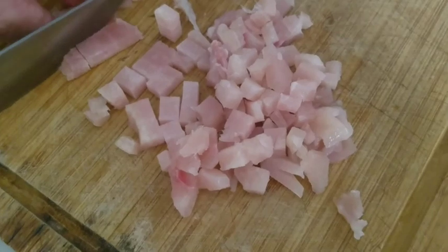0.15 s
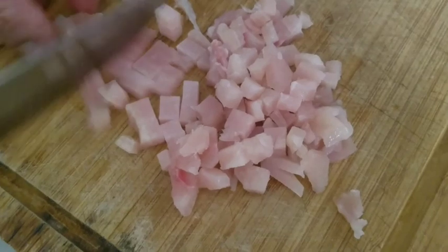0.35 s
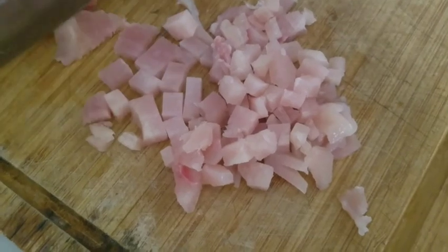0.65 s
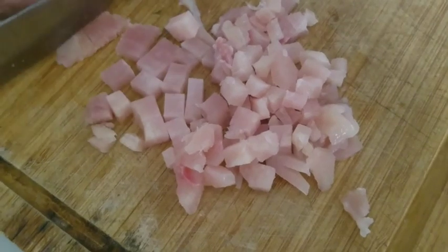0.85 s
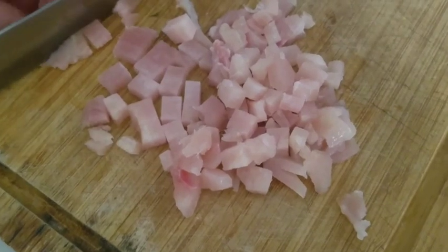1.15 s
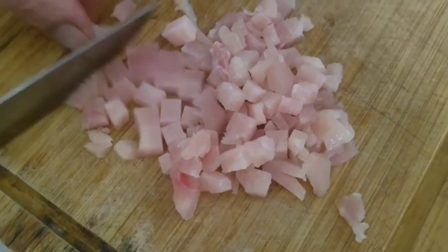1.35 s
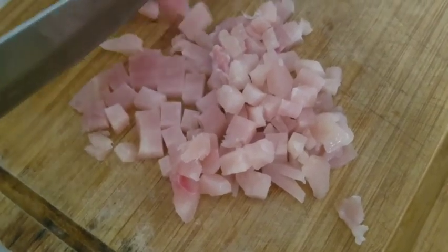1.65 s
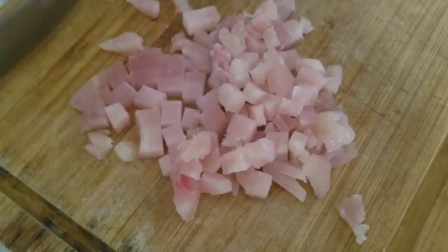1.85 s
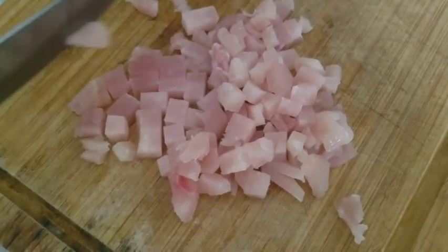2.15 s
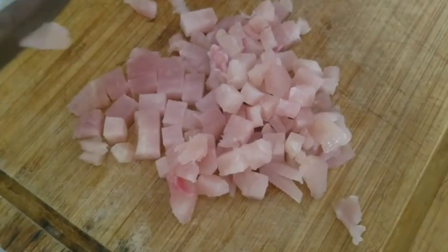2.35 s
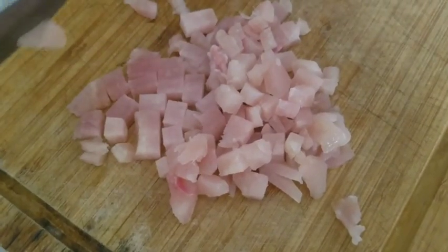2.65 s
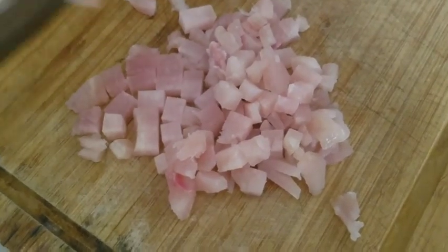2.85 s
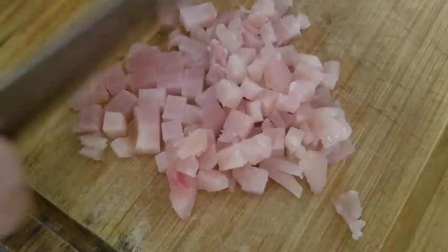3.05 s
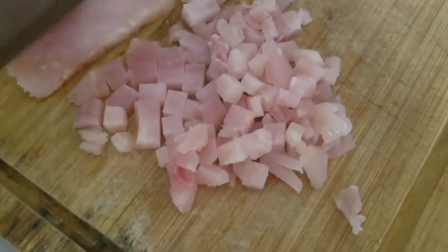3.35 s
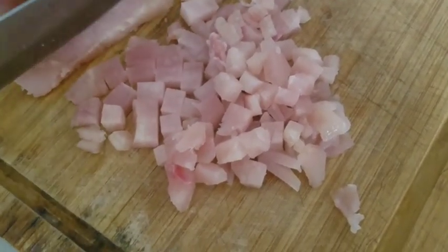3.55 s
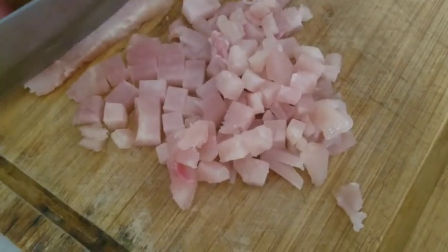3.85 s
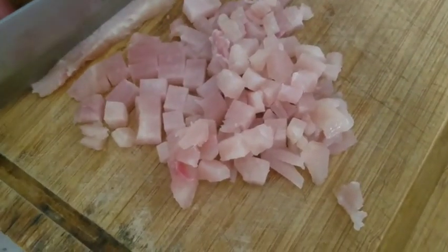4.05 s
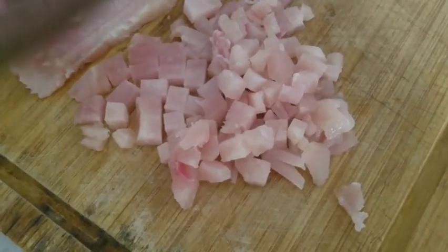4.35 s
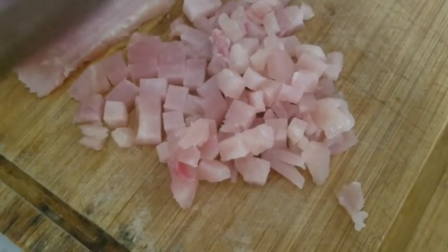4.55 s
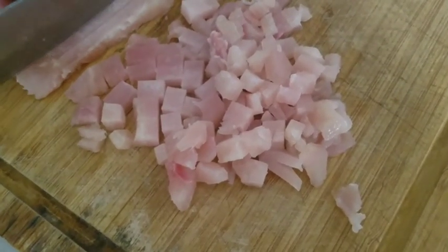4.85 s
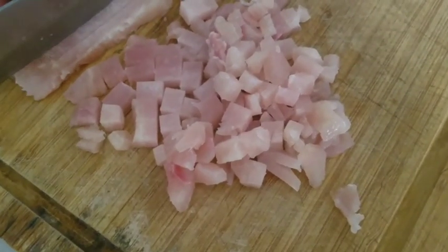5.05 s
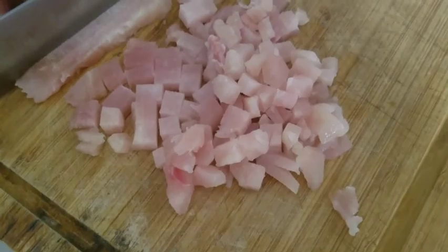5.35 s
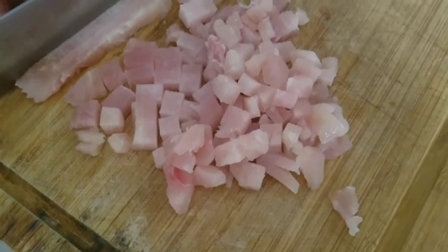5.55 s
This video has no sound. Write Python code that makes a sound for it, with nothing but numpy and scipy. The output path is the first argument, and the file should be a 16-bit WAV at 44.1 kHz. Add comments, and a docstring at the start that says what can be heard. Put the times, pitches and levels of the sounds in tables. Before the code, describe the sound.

A kitchen knife saws quietly through raw meat and lands on a wooden cutting board in separate, irregular knocks, each with a small thump from the counter. Gentle taps, wet ticks and a short scrape come first, followed by two firm chops and two harder ones. The sound is close, with a short room echo, over a faint appliance hum, microphone hiss and barely audible bird whistles.

```python
"""Cutting chicken on a board

In a small kitchen, close to the microphone, a knife cuts raw chicken into cubes on a wooden board.
The blade saws through the meat, knocks on the board, scrapes pieces aside and comes free with wet ticks.
Behind it an appliance hums, the microphone hisses, and a bird whistles faintly outside."""
import sys
import numpy as np
from scipy import signal
from scipy.fft import rfft, irfft
from scipy.io import wavfile
from scipy.ndimage import uniform_filter1d

SR = 44100
rng = np.random.default_rng(int(sys.argv[2]) if len(sys.argv) > 2 else 0)


def to_wav(s):
    """Save 16-bit WAV."""
    ch = np.atleast_2d(s).T  # columns
    pcm = np.round(np.clip(ch, -1, 1) * 32767)  # PCM
    wavfile.write(sys.argv[1], SR, pcm.astype(np.int16))


N = 250840


def amp(db):
    """Turns decibels into a number to multiply by."""
    return 10 ** (np.asarray(db) / 20)


def unit_rms(x):
    """Scales a sound so that its average strength (rms) is 1."""
    return x / np.sqrt(np.mean(x ** 2) + 1e-20)


def curve_at(points, hz):
    """Reads a smooth path through (frequency, value) points, on a log-frequency axis."""
    f, value = np.transpose(points)
    return np.interp(np.log(hz + 1), np.log(f + 1), value)


def add(mix, start, sound):
    """Mixes a sound in at a start time in seconds."""
    part = mix[..., max(round(start * SR), 0):][..., :sound.shape[-1]]
    part += sound[..., :part.shape[-1]]


def coloured(x, gain):
    """Turns each frequency up or down by gain(frequency), then scales to rms 1."""
    count = x.shape[-1]
    return unit_rms(irfft(rfft(x) * gain(np.fft.rfftfreq(count, 1 / SR)), count))


def resonance(f, hz, width):
    """A hill-shaped gain that favours frequencies near hz."""
    return 1 / (1 + ((f - hz) / width * 1.3) ** 2)


def noise_burst(hz, octaves, t60):
    """A tick of noise around hz with peak 1; t60 is the time in seconds to fade by 60 dB."""
    t = np.arange(SR // 8) / SR
    edges = np.minimum(hz * 2 ** (np.array([-.5, .5]) * octaves), SR / 2 - 100)
    noise = rng.standard_normal(len(t)) * amp(-60 * t / t60)
    out = signal.sosfilt(signal.butter(2, edges, "bandpass", fs=SR, output="sos"), noise)
    return out / abs(out).max()


# first echoes from counter, wall and cupboards: left delay/s, right delay/s, relative gain
ECHOES = [(.0052, .0047, 0.26), (.0074, 0.0061, 0.85), (.0097, 0.011, 0.54), (.0165, 0.011, 0.12),
          (.0240, .0243, .17), (.0332, 0.026, .12)]
# how long the room rings: f/Hz, t60/s
ROOM_DECAY = [(150, 0.15), (400, 0.4), (900, 0.21), (2000, 0.27), (6000, 0.38), (14000, 0.27)]
def kitchen(x, tail_db, echo_db, left_db, likeness=0.85):
    """Adds echoes and a short tail of blurred ones, most alike in both ears at low pitch."""
    count = SR // 2
    bounces = rng.choice([-1., 1.], (3, count)) * (rng.random((3, count)) < 3000 / SR)
    hz, t, bands = signal.stft(bounces, SR, nperseg=256)  # left, right, shared
    shared = np.clip(likeness / (1 + (hz / 2200) ** 2), 0, 1)[:, None]
    bands = np.sqrt(shared) * bands[2] + np.sqrt(1 - shared) * bands[:2]
    bands *= amp(-60 * t / curve_at(ROOM_DECAY, hz)[:, None])
    fade_in = np.clip((np.arange(count) / SR - .003) / 0.011, 0, 1)
    tail = signal.istft(bands, SR, nperseg=256)[1][:, :count] * fade_in
    response = amp(tail_db) * unit_rms(tail) / np.sqrt(count)
    response[:, 0] += 1  # the direct sound
    for left_s, right_s, gain in ECHOES:
        response[[0, 1], [round(left_s * SR), round(right_s * SR)]] += gain * amp(echo_db)
    balance = amp([[left_db / 2], [-left_db / 2]])
    return signal.fftconvolve(np.atleast_2d(x), response, axes=1)[:, :x.shape[-1]] * balance


# whining bands in the hiss: f/Hz, width/Hz, left level/dB, right level/dB
HISS_BANDS = [(4823, 1060, -73, -60), (5920, 320, -99, -64), (7046, 1050, -69, -54.5),
              (7062, 103, -77, -55), (8300, 760, -73.5, -74), (10850, 890, -71, -57.5),
              (13960, 3400, -67.5, -58.5), (14900, 500, -82, -70)]
def microphone_hiss(floor_db=-59):
    """An even hiss plus high whining bands, stronger on the right."""
    out = amp(floor_db) * rng.standard_normal((2, N))
    for hz, width, left_db, right_db in HISS_BANDS:
        whine = coloured(rng.standard_normal((2, N)), lambda f: resonance(f, hz, width) ** 2)
        out += amp([[left_db], [right_db]]) * whine
    return out


# tone colour of the rumble: f/Hz, relative level/dB
RUMBLE_COLOUR = [(15, -34), (25, -66), (38, -6.5), (70, -1.5), (92, -2), (192, -4), (213, -8), (242, -5.5),
                 (361, -4.5), (393, -4), (637, -15.5), (707, -13), (1120, -19), (1940, -17), (3800, -31),
                 (4940, -34), (8360, -120)]
# how alike the rumble is in both ears: f/Hz, likeness (0 to 1)
RUMBLE_LIKENESS = [(60, 0.93), (200, 0.87), (400, 0.47), (900, 0.064), (2500, 0.059)]
# motor tones: f/Hz, width/Hz, level/dB
MOTOR_TONES = [(97.2, 19, -55), (195.7, 4.1, -67), (245.5, 21, -69.5), (386.5, 20, -63), (434.4, 10.7, -61)]
def appliance(rumble_db=-50, right_db=0.5):
    """A low, airy rumble with a few wavering motor tones."""
    left, other, motor = rng.standard_normal((3, N))
    likeness = curve_at(RUMBLE_LIKENESS, np.fft.rfftfreq(N, 1 / SR))
    right = irfft(likeness * rfft(left) + np.sqrt(1 - likeness ** 2) * rfft(other), N)
    rumble = amp(rumble_db) * coloured(np.array([left, right]), lambda f: amp(curve_at(RUMBLE_COLOUR, f)))
    hum = sum(amp(db) * coloured(motor, lambda f: resonance(f, hz, width))
              for hz, width, db in MOTOR_TONES)
    return (rumble + hum) * amp([[-right_db / 2], [right_db / 2]])


# bird whistles: t/s, length/s, start f/Hz, end f/Hz
WHISTLES = [(0.098, .1, 4380, 4410), (0.669, 0.24, 4570, 4360), (1.355, .21, 4230, 4510),
            (3.3, 0.14, 4180, 4240), (3.473, .13, 4300, 4500), (4.24, 0.13, 4400, 4520)]
def bird(level_db=-63, waver=0.0036):
    """A distant bird's thin whistles; each slides in pitch, quickly at first, and wavers a little."""
    out = np.zeros(N)
    for start, length, start_hz, end_hz in WHISTLES:
        progress = np.linspace(0, 1, int(length * SR))
        drift = unit_rms(uniform_filter1d(rng.standard_normal(SR // 2), 150))[:len(progress)]
        hz = (start_hz + (end_hz - start_hz) * progress ** 0.72) * (1 + waver * drift)
        tone = np.sin(2 * np.pi * np.cumsum(hz) / SR)
        add(out, start, amp(level_db) * tone * signal.windows.tukey(len(tone), .5))
    return out


# light taps of the blade, and a few crackles within a stroke: t/s, peak level/dB, centre f/Hz
TAPS = [(.063, -41, 2200), (.248, -41, 2500), (.4416, -37.5, 1230), (.922, -42, 2800), (0.9463, -40, 3000),
        (2.1677, -28, 4240), (2.191, -36.5, 1490), (2.2247, -36.5, 1640), (3.194, -44, 2500),
        (3.2523, -36, 1600), (3.284, -41, 1670)]
# wet smacks of meat: t/s, peak level/dB, centre f/Hz
SMACKS = [(.108, -45, 13000), (.248, -40, 13100), (.8655, -40, 12800), (1.806, -30, 11000),
          (1.82, -30.5, 13500), (2.955, -41, 6600), (3.015, -42, 12700)]
def taps_and_smacks(soft_smack_db=-39.5):
    """The blade taps lightly, a stroke crackles, and wet meat comes free with tiny smacks."""
    out = np.zeros(N)
    for start, db, hz in TAPS:
        add(out, start, amp(db) * noise_burst(hz, octaves=1.26, t60=0.017))
    for start, db, hz in SMACKS:
        octaves = .45 * 2 ** ((db - soft_smack_db) / 3)  # 3 dB stronger makes the band twice as wide
        add(out, start, amp(db) * noise_burst(hz, octaves, t60=0.032))
    return out


# where the dragged blade rings: f/Hz, width/Hz, relative level/dB
BLADE_RESONANCES = [(356, 85, -2), (870, 150, 1), (1390, 100, 1), (1880, 190, -18), (2235, 59, -8),
                    (3180, 220, -9), (4200, 290, -10.5), (6700, 1800, -11.5), (13500, 2200, -7)]
# scrapes across the board: t/s, length/s, level/dB, slip rate/Hz, centre f/Hz, spread/octaves
SCRAPES = [(1.064, 0.053, -36.5, 880, 897, 0.17), (1.142, 0.065, -32.5, 322, 1500, 1.24),
           (1.169, .043, -38, 335, 340, 0.2), (1.799, 0.035, -48, 440, 4120, 0.24)]
def scrapes(jitter=0.24, grit=0.084, leak=0.033):
    """The edge sticks and slips unevenly on the board, and each slip makes the blade ring."""
    out = np.zeros(N)
    blade = lambda f: sum(amp(db) * resonance(f, hz, width) for hz, width, db in BLADE_RESONANCES)
    for start, length, db, slip_hz, centre_hz, spread in SCRAPES:
        wander, noise = rng.standard_normal((2, SR // 8))[:, :int(length * SR)]
        slip_count = np.cumsum(slip_hz * (1 + jitter * unit_rms(uniform_filter1d(wander, 30)))) / SR
        slips = np.diff(np.floor(slip_count), prepend=0) + grit * noise  # one click for each slip
        contact = lambda f: 1 / (1 + (np.log2((f + 1) / centre_hz) / spread) ** 2) + leak
        judder = coloured(slips, lambda f: blade(f) * contact(f))
        add(out, start, amp(db) * judder * signal.windows.tukey(len(slips), .7))
    return out


# tone colour that blade and board give the sawing: f/Hz, relative level/dB
SAWING_COLOUR = [(400, -1.5), (600, -4.5), (850, 10), (1130, 1), (1450, 5), (2000, -1), (2600, -8),
                 (3400, -1.5), (4500, -7.5), (7200, -8.5), (9300, -26), (11500, -21.5), (16000, -20)]
# strokes through the meat: t/s of the hardest push, rise/s, fall/s, level/dB
STROKES = [(.089, 0.051, 0.045, -43.5), (.95, .11, 0.077, -42), (1.08, .051, 0.2, -43.5),
           (1.791, 0.029, 0.0066, -39.5), (2.41, 0.011, 0.0047, -40), (3.892, 0.15, .0074, -33),
           (4.06, .07, 0.14, -38.5), (5.083, 0.16, 0.017, -33), (5.249, .093, .16, -39.5)]
def sawing(fibres_per_s=7000, size_spread_db=4.5, firm_db=-38.5):
    """Countless fibres part under the sliding edge, and their tiny clicks blend into a fizz."""
    out, count = np.zeros(N), SR // 3
    for push_time, rise, fall, db in STROKES:
        treble_db_per_octave = 2.5 - 1.13 * max(firm_db - db, 0)  # lighter strokes are duller
        size = amp(size_spread_db * np.minimum(rng.exponential(1, count), 4))
        fibres = size * rng.choice([-1, 1], count) * (rng.random(count) < fibres_per_s / SR)
        colour = lambda f: amp(curve_at(SAWING_COLOUR, f) + treble_db_per_octave * np.log2(1 + f / 1000))
        force = np.interp(np.arange(count) / SR, [0, rise, rise + fall], [0, 1, 0]) ** 1.59
        add(out, push_time - rise, amp(db) * force * coloured(fibres, colour))
    return out


def struck(modes, pitch, sustain, hardness_hz, rise_s):
    """A struck thing rings with its own fading tones (modes); soft blows mute the high ones. Peak 1."""
    t, side = np.arange(SR // 2) / SR, np.array([[.5], [-.5]])
    out = 0
    for hz, db, t60, phase in modes:
        size = amp(db - 60 * t / (t60 * sustain)) / np.hypot(1, (hz / hardness_hz) ** 2)
        out = out + size * np.sin(2 * np.pi * hz * pitch * t + side * phase)
    out = out * (1 - np.exp(-t / rise_s))
    return -out / abs(out).max()


# tones of the board, the counter under it and the blade, before each chop retunes and damps them:
# f/Hz, relative level/dB, t60/s, phase between left and right/rad
BOARD_MODES = [(633, -11.5, 0.03, 1), (756, -18, 0.022, 2), (877, 16, 0.0096, 0.68), (897, -12, 0.072, 0),
               (999, -26, 0.15, 1), (1208, -19.5, 0.12, .5), (1194, -39, 0.027, 2), (1410, -27, 0.037, -1),
               (1800, -8, 0.031, 4.5), (1890, -25.5, 0.1, 0.9), (2173, 0, 0.02, 2.5), (3060, -10, 0.02, -2)]
COUNTER_MODES = [(84.5, -17.5, 0.27, 0), (141, -4.5, 0.086, 0), (197.2, -13.5, 0.29, 0.3),
                 (248.3, 0.5, 0.12, 0.49), (290.3, -4, 0.13, 0.14), (336.4, 4.5, 0.11, 0.49),
                 (378.8, 2, 0.12, 0.067), (401.5, -1.5, 0.21, 0.11), (440, -17, 0.36, 0.082),
                 (496, -18, 0.079, 0.061)]
CLACK_MODES = [(1500, 0, 0.0094, 1.0)]
# blade meets board: t/s, knock level/dB, thump level/dB, hardness/Hz, meat under the blade (0 to 1)
CHOPS = [(0.1068, -37, -36.5, 1200, 0.6), (0.8866, -29, -42, 750, 0.14), (1.7914, -7.5, -24, 1955, 0.19),
         (2.1673, -32, -40, 2060, 0.03), (2.4143, -13.5, -26, 1500, 0.92), (3.8952, -1.5, -23, 1650, 0.09),
         (4.4761, -27.5, -29, 950, 0.26), (4.799, -32, -28, 1560, 0.28), (5.0851, -.5, -21, 1620, 0.09)]
def chops(firm_hz=1620):
    """The edge clicks, blade and board knock, and the counter thumps under the weight of the blow."""
    out = np.zeros((2, N))
    for start, knock_db, thump_db, hardness_hz, meat in CHOPS:
        pitch = 1.005 * (1 - 0.142 * meat)  # meat under the blade lowers the knock
        sustain = 0.89 * (1 - 0.76 * meat)  # and shortens the ringing
        clack_db = -9 + 0.87 * knock_db + 9.5 * np.log2(hardness_hz / firm_hz)  # hard blows clack more
        knock = amp(knock_db) * struck(BOARD_MODES, pitch, sustain, hardness_hz, rise_s=0.0038)
        knock += amp(clack_db) * struck(CLACK_MODES, pitch, sustain, hardness_hz, rise_s=0.0062)
        # a dip at 550 Hz, between the tones of the counter and the board
        knock = signal.lfilter(*signal.iirnotch(550, Q=4, fs=SR), knock)
        click = amp(thump_db - 4.5) * noise_burst(hz=2850, octaves=2.6, t60=0.026)
        add(knock, .0005, signal.lfilter(*signal.butter(2, 4800, fs=SR), click))  # meat cushions the edge
        thump = amp(thump_db) * struck(COUNTER_MODES, 0.99, sustain, hardness_hz, rise_s=0.0045)
        add(out, start, kitchen(knock, tail_db=-7, echo_db=-8.5, left_db=2.5))
        add(out, start + 0.00045, kitchen(thump, tail_db=-7.5, echo_db=-15, left_db=-1, likeness=0.36))
    return out


def scene():
    """The knife at work in the kitchen, over the appliance and the bird."""
    slicing = kitchen(sawing(), tail_db=-6, echo_db=-3, left_db=2.5, likeness=0.092)
    scraping = kitchen(scrapes(), tail_db=-9.5, echo_db=-5.5, left_db=2.5, likeness=0.22)
    ticking = kitchen(taps_and_smacks(), tail_db=-8, echo_db=-4, left_db=1, likeness=.4)
    return chops() + slicing + scraping + ticking + bird() + appliance()


# the microphone's two openings colour the treble differently: f/Hz, left minus right level/dB
MIC_BALANCE = [(2000, -1.5), (3500, -7), (4300, -11), (6200, -15.5), (7100, -14), (8200, -25), (9000, 17),
               (11000, -3), (12500, 7), (15000, -4)]
def record(dry, ceiling=.95, top_hz=15900):
    """The microphone colours each side, adds hiss, rounds off loud peaks and cuts the highest treble."""
    balance_db = curve_at(MIC_BALANCE, np.fft.rfftfreq(N, 1 / SR))
    sides = amp([balance_db / 2, -balance_db / 2])
    sides /= np.sqrt(np.mean(sides ** 2, 0))
    heard = irfft(rfft(dry) * sides, N) + microphone_hiss()
    rounded = heard / (1 + (heard / ceiling) ** 8) ** (1 / 8)
    lowpass = signal.firwin(511, top_hz, window=("kaiser", 9), fs=SR)
    return signal.oaconvolve(rounded, lowpass[None], "same")


dry = scene()
out = record(dry)
to_wav(out)
```